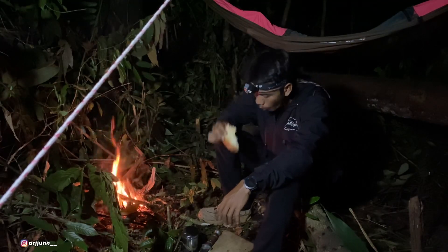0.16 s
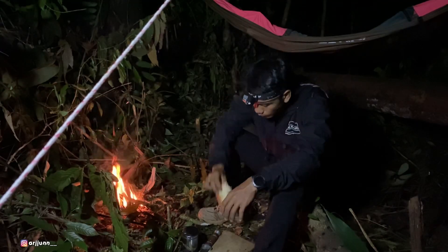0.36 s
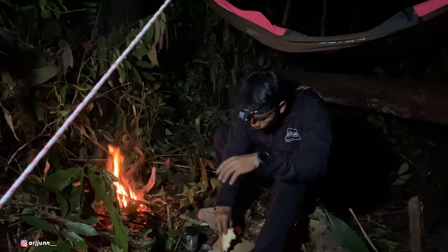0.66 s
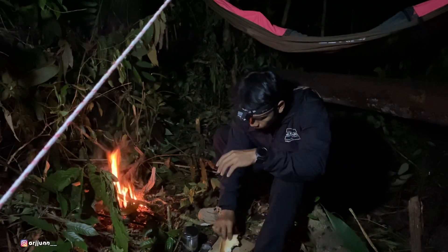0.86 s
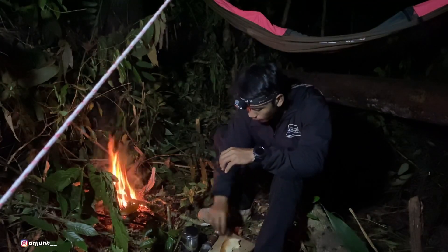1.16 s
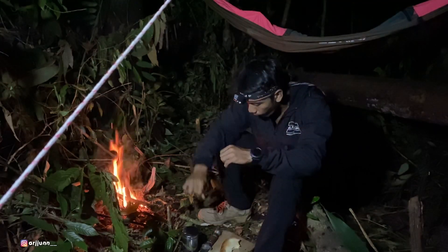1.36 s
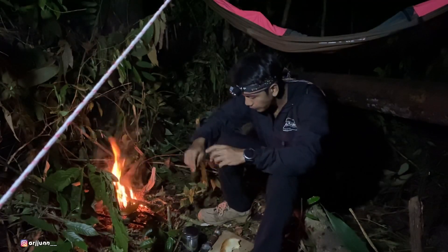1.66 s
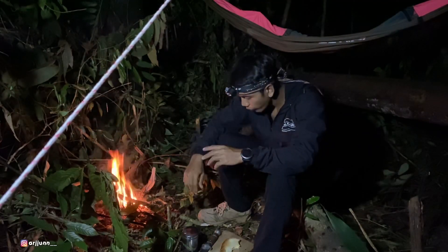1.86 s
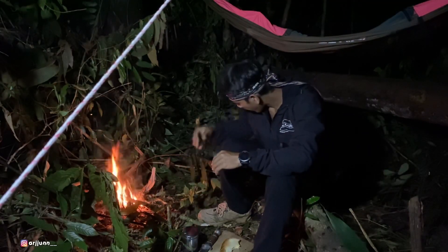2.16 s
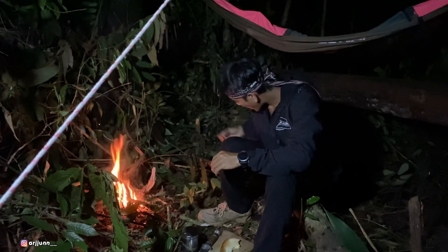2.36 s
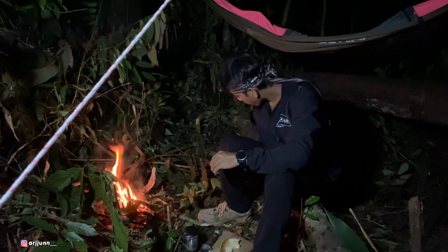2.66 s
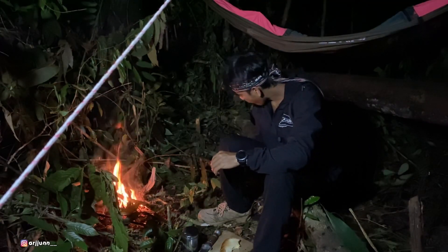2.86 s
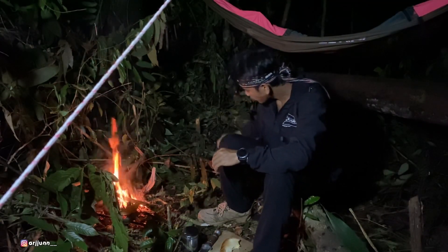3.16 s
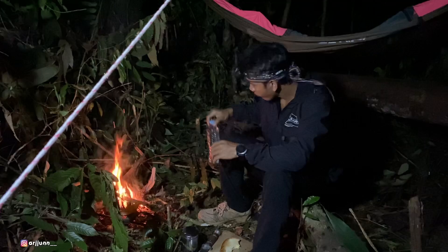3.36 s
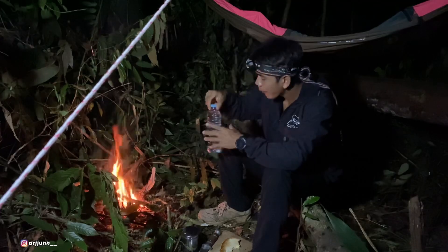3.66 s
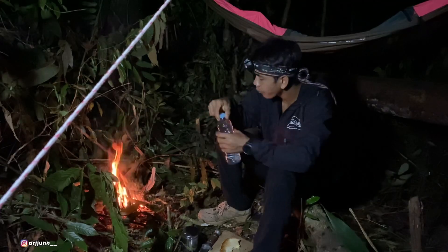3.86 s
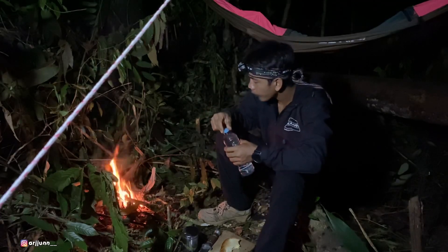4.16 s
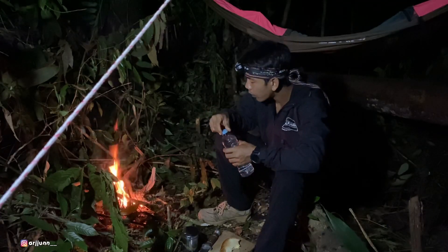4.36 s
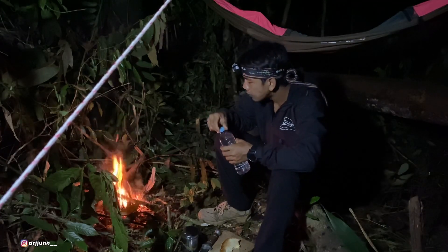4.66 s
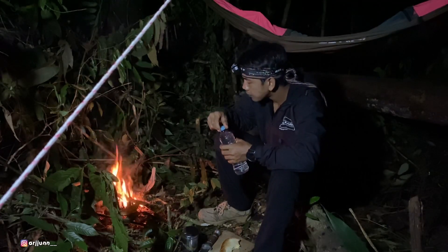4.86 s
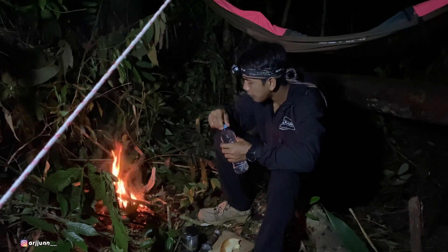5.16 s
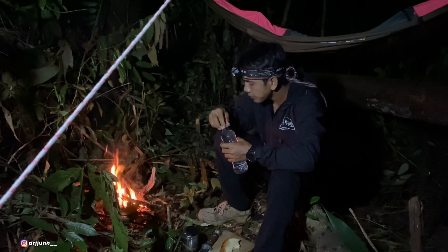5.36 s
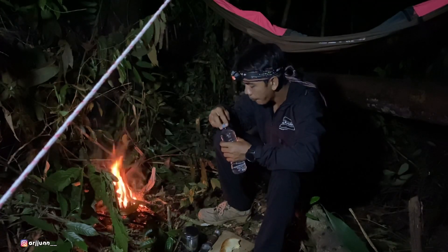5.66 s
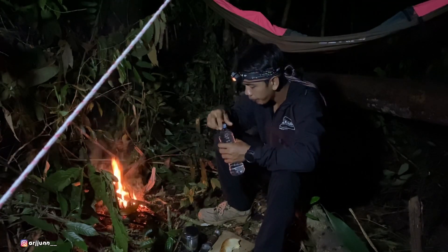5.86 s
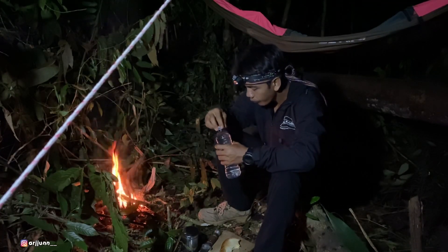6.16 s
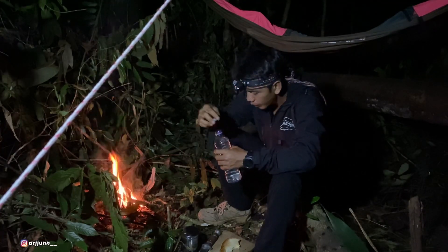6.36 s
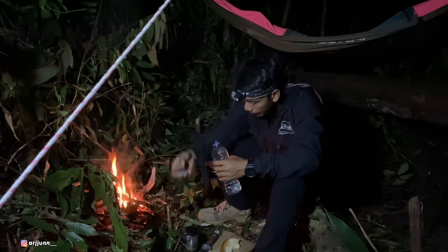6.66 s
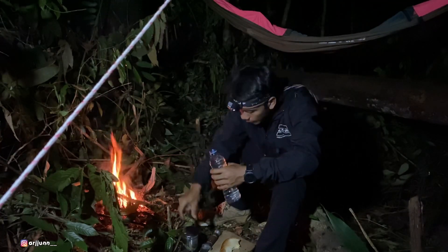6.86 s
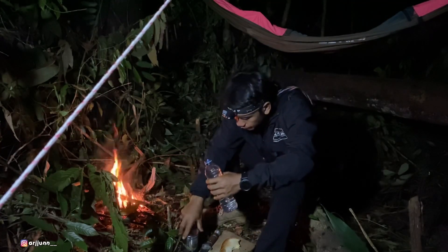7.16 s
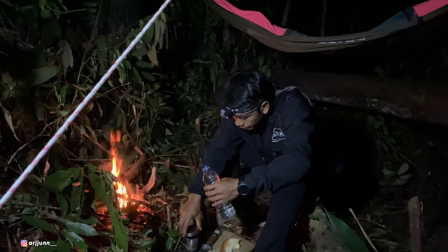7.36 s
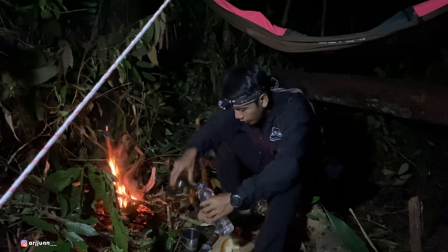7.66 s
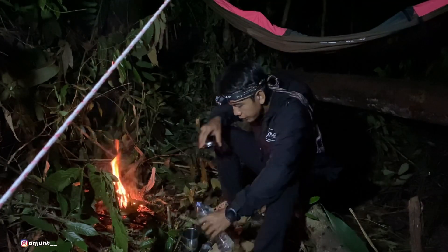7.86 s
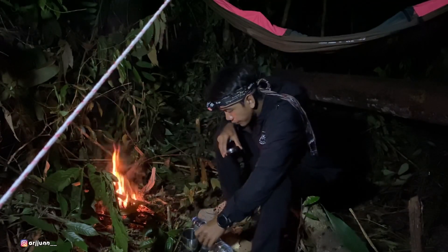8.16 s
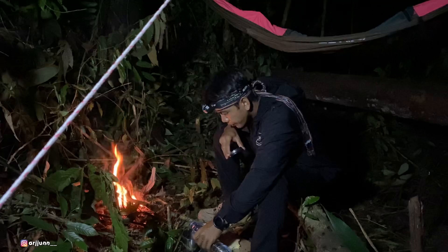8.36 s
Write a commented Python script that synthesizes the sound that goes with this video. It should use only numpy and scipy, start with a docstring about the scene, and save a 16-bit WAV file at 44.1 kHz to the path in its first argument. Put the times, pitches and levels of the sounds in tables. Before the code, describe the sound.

Crickets trill throughout in a tropical forest at night, shrill overlapping bouts that swell and ebb all around, with a softer buzz beneath. Distant katydids hiss and give short, very high chirps about twice a second. A lower, pulsing cricket call cuts off just after the start, returns at about 4.3 seconds, rises in pitch and strength, and stops at 6.4 seconds. Close by, a small campfire murmurs very faintly; its wood snaps sharply at 2.3 and 2.8 seconds and more weakly near 4 seconds. Someone beside it shifts in the leaves, making quiet rustles, soft ground thuds and scattered light taps of twigs and a bottle, clearest around 2.1, 4.3 and 6.2 seconds. The far hiss grows a little towards 7.6 seconds. At about 8.4 seconds the bottle gives one short hollow plop while the insects carry on.

```python
"""Crickets trill in overlapping bouts in a tropical forest at night, each wing stroke a short tone;
a lower one gives drawn-out rising calls. Further off, katydid wings hiss and chirp.
A small campfire murmurs, and pockets in the wood burst with a snap. Someone beside it rustles
in the leaves and handles a bottle, whose air rings in one hollow plop near the end."""
import sys
import numpy as np
from scipy import signal
from scipy.fft import rfft, irfft, next_fast_len
from scipy.io import wavfile
from scipy.ndimage import uniform_filter1d

SR = 44100
rng = np.random.default_rng(int(sys.argv[2]) if len(sys.argv) > 2 else 0)


def to_wav(s):
    """Save 16-bit WAV."""
    ch = np.atleast_2d(s).T  # columns
    pcm = np.round(np.clip(ch, -1, 1) * 32767)  # PCM
    wavfile.write(sys.argv[1], SR, pcm.astype(np.int16))


N = 375291
TIME = np.arange(N) / SR
FFT_SIZE = next_fast_len(N + SR, True)
FREQS = np.maximum(np.fft.rfftfreq(FFT_SIZE, 1 / SR), 1)

# far insects gathering strength: t/s, level/dB
FAR_LEVEL = [(0, -60.5), (3.1, -60.5), (6, -59), (7.6, -55.5), (8.5, -58.5)]
# thin, very high hiss: f/Hz, level/dB
THIN_HISS = [(11500, -25), (13000, -7), (14500, 2), (15500, 3), (16000, -5)]


def from_db(db):
    """Decibels to gain."""
    return 10 ** (np.asarray(db) / 20)


def rms_one(x):
    """Scale to rms 1."""
    return x / np.sqrt(np.mean(x ** 2) + 1e-20)


def in_time(points):
    """Table interpolated over time."""
    return np.interp(TIME, *np.transpose(points))


def at_hz(points):
    """Table interpolated over log frequency."""
    hz, value = np.transpose(points)
    return np.interp(np.log(FREQS), np.log(hz), value)


def shaped(x, response):
    """Filter by a frequency response."""
    return irfft(rfft(x, FFT_SIZE) * response, FFT_SIZE)[..., :N]


def drift(rate_hz):
    """Random wander, rms 1."""
    knots = rng.standard_normal(4096)
    return rms_one(np.interp(TIME * rate_hz, np.arange(len(knots)), knots))


def panned(db):
    """Stereo gains, left minus right = db."""
    return from_db(np.array([[db], [-db]]) / 2)


def fade(start_s, t60_s):
    """Sudden start, exponential decay."""
    age = TIME - start_s
    return (age >= 0) * from_db(-60 * np.clip(age / t60_s, 0, 4))


def swell(peak_s, db, rise_s, fall_s):
    """Envelope: up 20 dB per rise_s, down 20 dB per fall_s."""
    distance = np.maximum((peak_s - TIME) / rise_s, (TIME - peak_s) / fall_s)
    return from_db(db - 20 * np.minimum(distance, 10))


def noise(spectrum):
    """Coloured stereo noise, rms 1; less alike at the two microphone ports where diffuse."""
    # likeness of the ports: f/Hz, correlation
    likeness = [(30, .97), (120, 0.93), (300, 0.67), (700, 0.28), (2000, 0.57), (5000, 0.45), (6500, 0.33),
                (8000, 1), (16000, 1)]
    alike, gain = np.clip(at_hz(likeness), 0, 1), from_db(at_hz(spectrum))
    mid = shaped(rng.standard_normal(N), gain * np.sqrt(1 + alike))
    side = shaped(rng.standard_normal(N), gain * np.sqrt(1 - alike))
    return rms_one(np.array([mid + side, mid - side]))


def forest(x, wet_db, t60_s, count=120):
    """Direct sound plus echoes off trunks and leaves, separate for each port."""
    delays_s = rng.uniform(.003, .4, (2, count))
    gains = rng.standard_normal((2, count)) * from_db(-60 * delays_s / t60_s)
    response = np.zeros((2, SR // 2))
    for side in range(2):
        response[side, (delays_s[side] * SR).astype(int)] = gains[side] / np.linalg.norm(gains[side])
    echoes = signal.oaconvolve(np.broadcast_to(x, (2, N)), response, axes=1)[:, :N]
    return x + from_db(wet_db) * echoes


def night_air():
    """Faint steady hiss."""
    # f/Hz, level/dB
    spectrum = [(500, 0), (1000, -10), (2000, -16), (3200, 1), (4800, 11), (6200, 8.5), (9000, -2.5),
                (12000, -6.5), (16000, -11)]
    return from_db(-68.5) * noise(spectrum)


def far_hiss():
    """Distant katydid wings merge into rasping bands; a thin hiss swells above them."""
    # main, upper and low trill bands: f/Hz, level/dB
    hiss_band = [(5900, -38.5), (6300, -9.5), (6650, -2), (7150, 1.5), (7700, 1.5), (8050, 1), (8600, -0.5),
                 (9400, -13.5), (10000, -9), (11500, -40)]
    upper_band = [(7500, -23), (8800, 4.5), (10000, -3), (11200, 1), (11800, -8.5), (14000, -10.5),
                  (16000, -26)]
    trill_band = [(1900, -25), (2300, -7), (2550, 5), (2850, 0.5), (3200, -33), (3700, -27)]
    # upper band envelope: t/s, level/dB
    upper_level = [(0, -82), (.35, -75), (.8, -85), (1.4, -74), (1.8, -78), (3.7, -78.5), (4.8, -73.5),
                   (5.5, -70), (6.5, -66.5), (7.2, -66), (7.7, -63), (8.4, -70)]
    # brief swells of thin, very high hiss, some with the camper's movements: t/s, level/dB
    thin_swells = [(1.03, -71), (1.17, -72), (1.5, -71), (1.89, -65), (2.09, -69), (2.3, -71),
                   (3.14, -64.5), (3.31, -71), (3.96, -73), (6.35, -74), (7.67, -65), (7.81, -67),
                   (8.29, -72)]
    upper_db = in_time(upper_level)
    hiss = from_db(in_time(FAR_LEVEL) + 1.5 + 1.5 * drift(230)) * noise(hiss_band)
    upper = from_db(upper_db + 4.5 + 1.3 * drift(300)) * noise(upper_band)
    thin_peaks = np.max([swell(s, db, rise_s=.07, fall_s=.18) for s, db in thin_swells], axis=0)
    thin_bed = from_db(upper_db - 8.5)
    thin = np.hypot(thin_peaks, thin_bed) * from_db(2.4 * drift(250)) * noise(THIN_HISS)
    trill = from_db(-74.4 + 2 * drift(90)) * noise(trill_band)
    return from_db(-1) * (hiss + upper + thin + trill)


def far_crickets(count=9):
    """Distant crickets, one pitch each, flicker in and out of the hiss."""
    out = np.zeros(N)
    for hz in np.geomspace(6650, 8050, count):
        level = from_db(6.9 * np.minimum(drift(24), 2))
        out += level * np.sin(2 * np.pi * np.cumsum(hz + 35 * drift(150)) / SR)
    return from_db(in_time(FAR_LEVEL) - 6) * rms_one(out)


def katydid_chirps(gap_s=.015, first_s=.0021, second_s=.011):
    """A short wing stroke, then a longer one."""
    # double chirps: t/s, level/dB, f/Hz
    chirps = [(1.2394, -51, 7950), (2.3321, -47, 7990), (2.7766, -51, 8000), (3.2274, -49, 8000),
              (3.678, -48, 7930), (4.1154, -47, 8000), (4.5535, -44.5, 7980), (4.9984, -50, 7980),
              (5.4335, -48, 8040), (5.5744, -49, 7260), (5.8744, -47, 8060), (6.341, -48, 8100),
              (6.8853, -59, 7800), (7.3502, -48, 7160), (7.5264, -59, 7400), (7.9194, -51, 7280)]
    out = np.zeros(N)
    for s, db, hz in chirps:
        near = np.abs(TIME - s) < .1
        age = TIME[near] - s - first_s
        strokes = .75 * np.exp(-(age / first_s) ** 2) + np.exp(-((age - gap_s) / second_s) ** 2)
        out[near] += from_db(db - 2) * strokes * np.sin(2 * np.pi * hz * age)
    return forest(out, wet_db=-17, t60_s=.3)


def fire():
    """The flame flutters; pockets in the wood burst with a bright snap."""
    # flame murmur: f/Hz, level/dB
    flame_band = [(20, -26), (32, -16), (48, 0), (70, 0.5), (120, -3), (166, -6), (230, -9.5), (420, -9),
                  (634, -19.5), (900, -25), (1500, -45)]
    # settling flame, and snaps: t/s, level/dB
    flame_level = [(0, -67.5), (2.5, -67), (5.2, -68.5), (6, -70.5), (8.5, -69.5)]
    snaps = [(2.2983, -37.5), (2.822, -42), (3.937, -50), (3.9629, -49)]
    flame = from_db(in_time(flame_level) - .3 + 2.38 * drift(25)) * noise(flame_band) * panned(1.2)
    bursts = sum(from_db(db - 6.3) * (fade(s, .011) + .22 * fade(s, .15)) for s, db in snaps)
    return flame + bursts * noise([(1000, -18), (5000, -1), (8000, 0), (11000, 8), (16000, -1)])


def crunch(clicks_per_s=300, spread_db=3.8, count=12):
    """Leaf fibres give way in tiny clicks, each ringing a few cycles."""
    sizes = from_db(spread_db * np.minimum(rng.exponential(1, N), 3)) * rng.choice([-1, 1], N)
    clicks = sizes * (rng.random(N) < clicks_per_s / SR)
    band = rng.integers(0, count, N)
    out = np.zeros(N)
    for k, hz in enumerate(np.geomspace(1450, 4200, count)):
        out += signal.lfilter(*signal.iirpeak(hz, 3.5, fs=SR), clicks * (band == k) + 1e-18) / hz
    return rms_one(out)


def leaves():
    """Leaves slide, swish and crunch as the camper moves."""
    # movements: t/s, level/dB, rise/s, fall/s
    rustles = [(.19, -73, .2, .5), (.42, -65, .4, .4), (.55, -68, .06, .4), (1.23, -63.5, .26, .35),
               (1.48, -64.5, .4, .27), (1.89, -72, .15, .35), (2.125, -65, .07, .04),
               (2.26, -68.5, .12, .5), (3.36, -73.5, .1, .8), (4.06, -74, .9, .25), (4.29, -72, .06, .05),
               (5.3, -81, .3, .3), (6.12, -71, .12, .2), (6.232, -63, .02, .12), (6.47, -69.5, .25, .25),
               (6.635, -68, .06, .2), (6.9, -74, .15, .4), (7.67, -64.5, .28, .4), (7.88, -71, .2, .55),
               (8.345, -68, .04, .07)]
    # leaf friction: f/Hz, level/dB
    slide_band = [(300, 5), (700, -8.5), (1400, -4.5), (2200, 5), (3500, 4.5), (6000, -4), (12000, -8.5),
                  (16000, -28)]
    motion = np.max([swell(*row) for row in rustles], axis=0)
    slide = from_db(.9 + 1.34 * drift(260)) * noise(slide_band)
    swish = from_db(-8) * noise(THIN_HISS)
    crackle = from_db(-4.3) * forest(crunch(), wet_db=-6, t60_s=.15)
    return motion * (slide + swish + crackle)


def knocks(hits, t60_s, q):
    """Each brief rough contact rings one broad resonance."""
    out = np.zeros(N)
    for s, db, hz in hits:
        contact = fade(s, t60_s) * rng.standard_normal(N)
        body = signal.lfilter(*signal.iirpeak(hz, q, fs=SR), contact)
        out += from_db(db) * body / np.abs(body).max()
    return out


def handling(thud_cutoff_hz=600):
    """Twigs and the bottle knock; the ground thuds."""
    # hard taps and soft bumps: t/s, level/dB, f/Hz
    tap_hits = [(0.632, -58, 1730), (0.6797, -55, 2180), (1.4384, -56.5, 1340), (1.5319, -54, 2190),
                (2.1135, -49.5, 2210), (2.1219, -50, 2240), (2.2358, -61, 2580), (3.3603, -58, 1910),
                (4.2852, -48, 2600), (6.226, -51.5, 2100), (6.6303, -55, 2440), (7.6101, -56, 1790),
                (8.329, -53, 2000)]
    ground_hits = [(.41, -55, 70), (0.938, -51, 80.7), (1.159, -51.5, 70.0), (2.279, -51, 61.9),
                   (3.43, -55, 75), (4.1, -54, 70), (4.578, -55, 130), (5.124, -56, 164), (6.25, -54, 340),
                   (7.153, -53, 300), (7.259, -53, 61.9), (7.36, -55, 100)]
    taps = from_db(-1) * knocks(tap_hits, t60_s=.053, q=5.8)
    bumps = from_db(-2.5) * knocks(ground_hits, t60_s=.1, q=3.9)
    thuds = shaped(bumps, 1 / (1 + 1j * FREQS / thud_cutoff_hz))
    return forest(taps + thuds, wet_db=-9, t60_s=.17)


def bottle_plop(start_s=8.3802, level_db=-42, bend=.051, settle_s=.013, attack_s=.0021):
    """The air in the bottle rings briefly, bending up to pitch."""
    # air modes: f/Hz, level/dB, t60/s
    modes = [(917, 0, .1), (2998, -16, .1)]
    age = np.maximum(TIME - start_s, 0)
    bent_age = age - bend * settle_s * (1 - np.exp(-age / settle_s))
    ring = sum(from_db(level_db + db) * fade(start_s, t60_s) * np.sin(2 * np.pi * hz * bent_age)
               for hz, db, t60_s in modes)
    return forest(ring * np.minimum(age / attack_s, 1) * panned(-3.9), wet_db=-13, t60_s=.2)


def stridulate(bouts, duty, sag_hz, rise_hz, warm_s, swell_s, hurry, jitter, overtone_db,
               uneven_db=1.37, lead_rad=0, surge_db=0, surge_at_s=1, surge_s=.55):
    """Each wing stroke draws the file over the scraper: a short tone that sags in pitch."""
    out = np.zeros((2, N))
    for start, end, hz, rate_hz, db, pan_db in bouts:
        on = (TIME >= start) & (TIME < end)
        age = TIME[on] - start
        cold = np.exp(-age / warm_s)   # a bout starts low and hurried
        strokes = np.cumsum(rate_hz * (1 + hurry * cold + jitter * drift(8)[on])) / SR
        stroke_s = duty / rate_hz
        along = np.minimum(strokes % 1 / duty, 1)
        phase = 2 * np.pi * stroke_s * along * (hz - rise_hz * cold + sag_hz * (1 - along) / 2)
        phase = phase + lead_rad * rng.choice([-1, 1]) * np.array([[.5], [-.5]])   # one port is nearer
        tone = np.sin(phase) + from_db(overtone_db) * np.sin(2 * phase)
        force_db = uneven_db * rng.standard_normal(2048)[strokes.astype(int)]
        effort_db = surge_db * np.exp(-((age - surge_at_s) / surge_s) ** 2)   # builds, then tires
        gate = (1 - np.exp(-age / swell_s)) * np.minimum((end - TIME[on]) / .04, 1)
        level = from_db(db + force_db + effort_db) * gate
        out[:, on] += panned(pan_db) * level * np.sin(np.pi * along) * tone
    return out


def thin_crickets():
    """Faint, very high trills."""
    # bouts: start/s, end/s, f/Hz, stroke rate/Hz, level/dB, pan/dB
    bouts = [(-1, 3.6, 11290, 94, -3, 0), (.9, 6, 11320, 103, -5, 0), (2, 4.9, 11110, 123, -2, 0),
             (.8, 1.9, 10950, 123, -6, 0)]
    trills = stridulate(bouts, duty=.82, sag_hz=200, rise_hz=60, warm_s=.3, swell_s=.13,
                        hurry=.003, jitter=.0014, overtone_db=-80)
    return from_db(-68) * forest(trills, wet_db=-1, t60_s=.48)


def buzzing_crickets():
    """Fast strokes blur into a buzz that surges once per bout."""
    # bouts: start/s, end/s, f/Hz, stroke rate/Hz, level/dB, pan/dB
    bouts = [(-3, .79, 4250, 113.2, -1, 3), (-3, 2.5, 4270, 111.6, -13, 3),
             (.87, 2.57, 4215, 113.25, .5, 5), (2.64, 4.37, 4215, 113.25, 0, 5),
             (4.46, 9, 4235, 113.2, -1.5, 5), (4.3, 9, 4250, 111.6, -7, 3)]
    buzz = stridulate(bouts, duty=.63, sag_hz=240, rise_hz=60, warm_s=.4, swell_s=.04, hurry=.004,
                      jitter=.001, overtone_db=-40, uneven_db=1.8, lead_rad=.33, surge_db=4.5)
    return from_db(-58.6) * forest(buzz, wet_db=-1, t60_s=.44)


def low_cricket(hz=3654, rate_hz=31, rise_hz=290, turn_drop_hz=124, warm_s=.46, swell_s=.14,
                back_s=.45, lean=.15, grip=.6, ring_over=.25):
    """Wings sound on closing and opening; pitch and back stroke build as the call warms."""
    # calls: start/s, end/s
    calls = [(-2, .22), (4.26, 6.385)]
    out = np.zeros((2, N))
    for start, end in calls:
        age = np.maximum(TIME - start, 0)
        wing = 2 * np.pi * rate_hz * age
        one_way = lean + (1 - lean) * np.exp(-(age / back_s) ** 2)   # closing stroke only at first
        speed = one_way - np.cos(wing)
        pitch_hz = hz - rise_hz * np.exp(-(age / warm_s) ** 1.3) + 5 * drift(70)
        phase = 2 * np.pi * np.cumsum(pitch_hz) / SR + np.array([[.5], [-.5]])   # left leads 1 rad
        tone = np.tanh(grip * speed) / np.tanh(grip) * np.sin(phase)
        tone += ring_over * np.sin(wing) * np.cos(phase)
        # wings slow at the turn: a brief lower rasp
        turning = .2 * (1 - one_way) * np.exp(-(speed / .4) ** 2) * from_db(3 * drift(200))
        tone += turning * np.sin(phase - 2 * np.pi * turn_drop_hz * age)
        gate = (1 - np.exp(-age / swell_s)) * np.clip((end - TIME) / .0089, 0, 1)
        effort_db = .35 * np.minimum(age, 2) ** 2 + .4 * drift(120)   # presses harder towards the end
        out += gate * tone / (1 + .55 * one_way) * from_db(effort_db)
    return from_db(-46.3) * forest(out * panned(4), wet_db=-10, t60_s=.67)


def shrill_chorus():
    """Near trills over a blur of far crickets, swelling and ebbing as a whole."""
    # bouts: start/s, end/s, f/Hz, stroke rate/Hz, level/dB, pan/dB
    bouts = [(-1, .75, 5660, 47.24, -4.5, 2), (-1, 1.45, 5650, 43.24, -6, 3),
             (.45, 4.5, 5420, 47.27, -9, -1), (.82, 3.4, 5630, 47.24, -3, 5),
             (1.52, 4.05, 5640, 43.24, -5, 1), (2.1, 6.85, 5660, 64.2, -6, -1),
             (2.6, 4.4, 5650, 95.3, -4, -1), (3.4, 5.42, 5610, 47.24, -4, 0),
             (4.18, 6.95, 5640, 43.24, -4.5, 5), (5.52, 6.95, 5610, 47.24, -6, -1),
             (6.27, 9, 5420, 47.27, -7, -1), (7.08, 9, 5630, 47.24, -2.5, 0), (7.55, 9, 5650, 64.2, -5, 0),
             (8.03, 9, 5630, 43.24, -7, 2)]
    # far crickets: f/Hz, level/dB
    blur_band = [(3000, -34.5), (4900, -33), (5250, -12), (5450, -5), (5620, 1), (5720, 1), (5830, -22.5),
                 (6100, -38.5)]
    # chorus envelope: t/s, level/dB
    chorus_level = [(0.0, -47), (0.02, -53), (0.26, -50), (0.4, -55), (0.66, -50), (0.78, -53), (1.8, -48),
                    (1.89, -51), (2.74, -49), (2.79, -53), (3.12, -44), (3.29, -55), (3.36, -50),
                    (5.92, -51), (6.51, -49), (7.03, -56), (7.69, -49), (8.5, -50)]
    trills = stridulate(bouts, duty=.64, sag_hz=150, rise_hz=398, warm_s=.16, swell_s=.046,
                        hurry=.04, jitter=.0004, overtone_db=-40, uneven_db=1.27, lead_rad=1.47)
    chorus = forest(trills, wet_db=-4, t60_s=.5) * panned(.68) + from_db(-16.3) * noise(blur_band)
    power = uniform_filter1d(chorus.mean(0) ** 2, SR // 5)
    levelled = chorus / np.sqrt(np.abs(power) + .03 * power.mean())
    return levelled * from_db(in_time(chorus_level) + .3)


def scene():
    """Insects all round, fire and camper close by."""
    background = night_air() + far_hiss() + far_crickets() + katydid_chirps()
    crickets = shrill_chorus() + buzzing_crickets() + thin_crickets() + low_cricket()
    camp = fire() + leaves() + handling() + bottle_plop()
    return background + crickets + camp


def record(dry, cutoff_hz=15800):
    """The two ports part in phase in the treble; steep low-pass on top."""
    # left port's lead: f/Hz, phase/rad
    port_phase = [(0, 0), (7000, 0), (8100, -1.7), (8600, -3), (9500, -3.3), (10400, -6.2), (11800, -6.4),
                  (12600, -9.2), (13800, -9.5), (14600, -12.5)]
    lead_rad = np.interp(FREQS, *np.transpose(port_phase))
    ports = np.exp(1j * lead_rad * np.array([[0], [-1]]))
    low_pass = 1 / np.sqrt(1 + (FREQS / cutoff_hz) ** 400)
    return shaped(dry, ports * low_pass)


dry = scene()
out = record(dry)
to_wav(out)
```